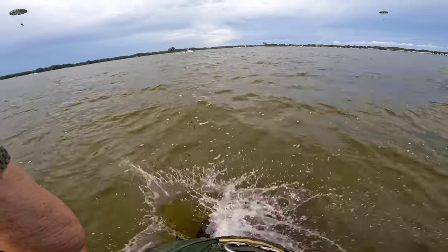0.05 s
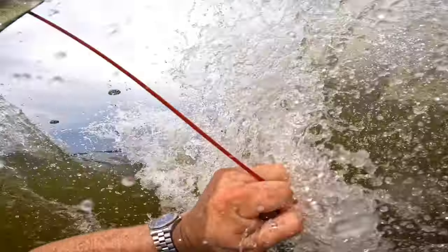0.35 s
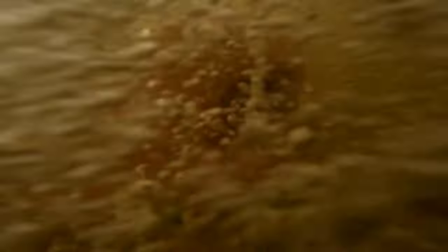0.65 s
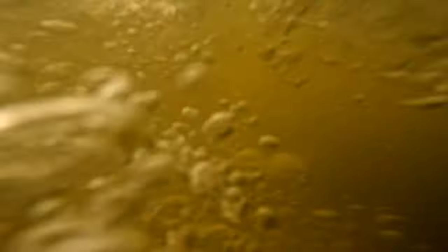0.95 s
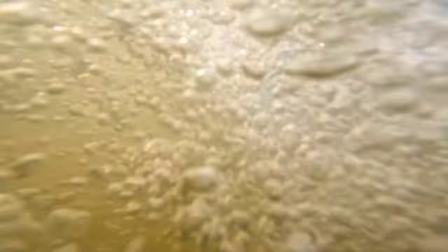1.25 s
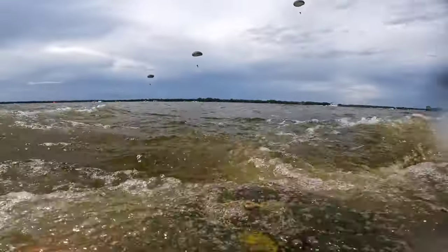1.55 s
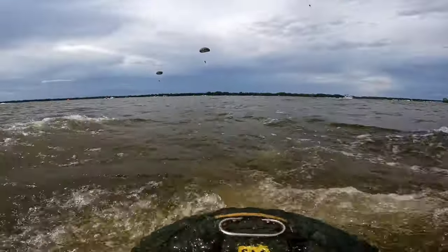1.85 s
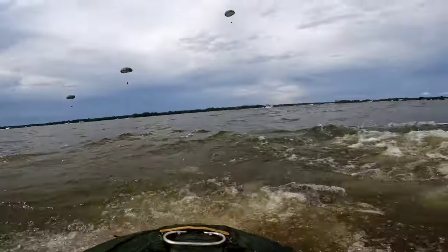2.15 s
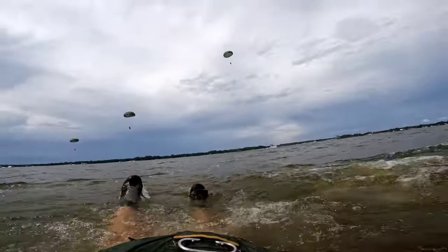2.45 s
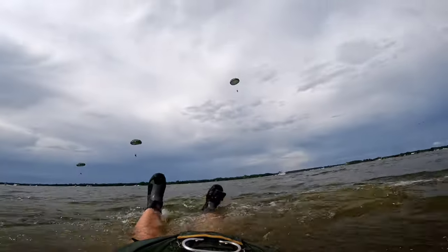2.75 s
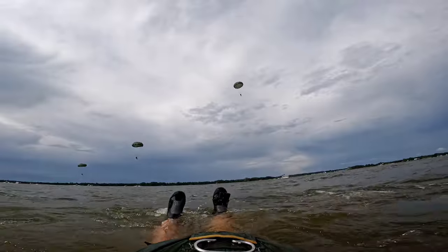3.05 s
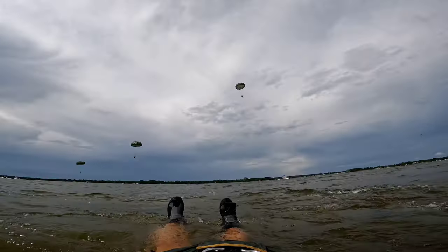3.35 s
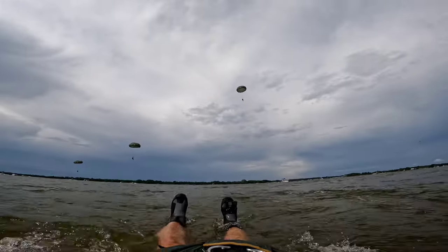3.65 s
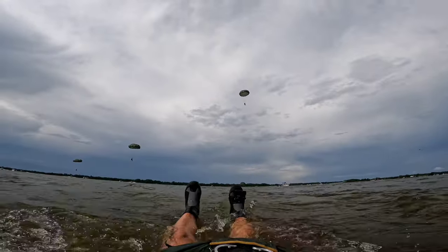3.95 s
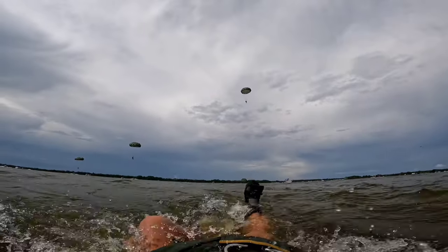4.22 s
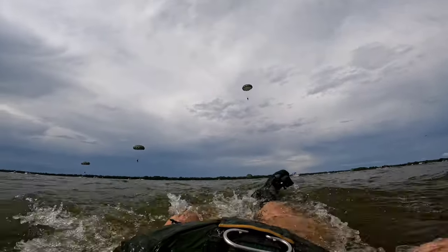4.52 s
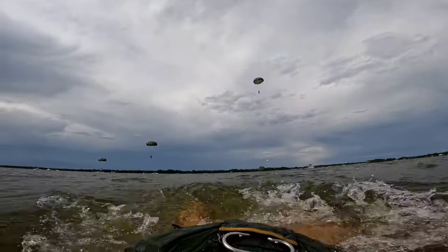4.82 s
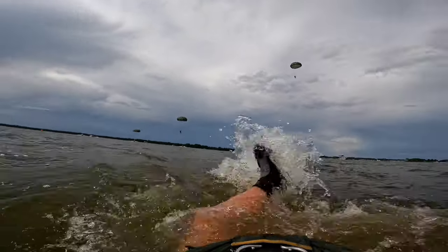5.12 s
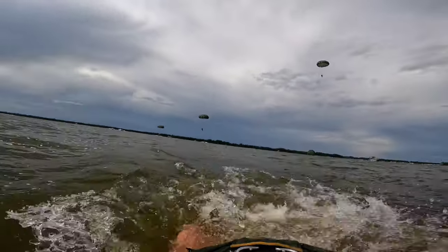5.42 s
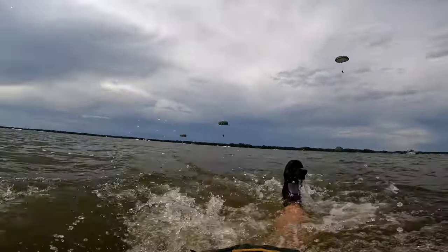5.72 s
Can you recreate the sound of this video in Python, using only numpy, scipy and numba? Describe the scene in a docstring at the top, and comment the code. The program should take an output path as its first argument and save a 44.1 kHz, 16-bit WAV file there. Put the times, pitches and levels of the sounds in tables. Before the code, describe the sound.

Wind buffets a body-worn microphone as a parachutist hits a lake in a rising sheet of spray. The microphone plunges under with dull thumps and a loud, muffled gurgle of bubbles. It surfaces to quiet lapping, small glugs and drops ticking on its case over a low rumble. Kicking legs then churn the water close by, and a thin, high fizz grows near the end.

```python
"""Water splashes over a parachutist's body-worn camera on landing in a lake. Wind buffets the microphone,
the feet plough up a sheet of spray, and the camera goes under in a cloud of bubbles, each ringing as
its trapped air pulsates. It surfaces with wet, muffled ports: water laps, drops tick on the case,
kicking legs churn the surface, and the water film on the left port begins to fizz."""
import sys
import numpy as np
from scipy import signal
from scipy.fft import rfft, irfft, next_fast_len
from scipy.io import wavfile
from scipy.ndimage import uniform_filter1d
from numba import njit

SR = 44100
rng = np.random.default_rng(int(sys.argv[2]) if len(sys.argv) > 2 else 0)


def materialize(psi):
    """Save the field psi as 16-bit PCM at rate SR to the path in sys.argv[1].

    A 1-D psi becomes a single channel; in a 2-D psi each row is a channel.
    """
    bounded = np.clip(np.atleast_2d(psi).T, -1, 1)
    quanta = np.round(bounded * 32767).astype(np.int16)
    wavfile.write(sys.argv[1], SR, quanta)


N = 254898
TIME = np.arange(N) / SR
# The feet touch the lake, the camera dips under, its ports flood, it comes up, the ports begin to drain.
TOUCH_S, DIVE_S, FLOOD_S, SURFACE_S, DRAIN_S = 0.14, 0.779, 1.007, 1.515, 4.05
WASH_RISE_S = 0.006

# Slaps of water on the case. Each row: start in seconds, thump pitch in Hz, thump and smack levels in dB.
SLAPS = [(0.164, 128, -30.5, -17), (0.779, 192, -4, -10.5), (0.801, 208, -3.5, -19.5),
         (1.049, 149, -8.5, -14.5), (1.319, 153, -18, -15), (1.392, 153.6, -9, -23.5),
         (1.427, 130, -13, -16.5), (1.514, 103.4, -5.5, -15), (1.652, 136, -7, -16),
         (2.195, 129.5, -24, -40), (2.294, 154, -23, -31), (2.724, 172, -10.5, -43.5),
         (3.244, 132, -22, -36.5), (5.172, 135, -12, -27.5)]
# Fat drops and the water that washes over the case with them.
# Each row: start in seconds, relative splat and wash levels in dB, drain time in seconds.
DROPS = [(1.77, -43.5, -66, 0.018), (2.191, -30.5, -50, 0.026), (2.7259, -20, -42, 0.037),
         (2.827, -28, -52, 0.045), (2.933, -26, -46, 0.029), (3.04, -28.5, -46, 0.011),
         (3.395, -32.5, -61.5, 0.0094), (4.175, -19.5, -48, 0.0064), (5.187, -17.5, -32.5, 0.018),
         (5.294, -20, -33, 0.013), (5.42, -17, -38, 0.0055), (5.508, -16, -39, 0.0085)]
# Spectral shape of churned water. Each row: frequency in Hz, gain in dB.
CHURN_COLOUR = [(250, -23), (420, -4.5), (600, 0.5), (900, 2), (1430, -2), (1650, -13), (2200, -16.5),
                (3500, -35.5), (5700, -50.5), (7500, -76)]


def from_db(db):
    """Decibels to amplitude gain."""
    return 10 ** (np.asarray(db) / 20)


def rms_one(x):
    """Normalisation to unit rms."""
    return x / np.sqrt(np.mean(x ** 2) + 1e-20)


def steady(x):
    """Division by the running rms evens out the slow level and leaves the grain."""
    power = uniform_filter1d(x ** 2, SR // 9)
    return x / np.sqrt(np.abs(power) + np.mean(x ** 2) / 1000)


def drift(rate):
    """Low-passed noise of unit spread wanders about rate times a second."""
    pole = np.exp(-80 * np.pi * rate / SR)
    slow = signal.lfilter([1], [1, -2 * pole, pole * pole], rng.standard_normal(N // 40 + 2002))[2000:]
    return np.interp(np.arange(N) / 40, np.arange(len(slow)), rms_one(slow))


def envelope(start_s, end_s, attack_s, release_s, sag_db_per_s=0):
    """Exponential attack, a hold that may sag, and exponential release."""
    age = np.maximum(TIME - start_s, 0)
    hold = from_db(-sag_db_per_s * np.minimum(age, end_s - start_s))
    return (1 - np.exp(-age / attack_s)) * hold * np.exp(-np.clip((TIME - end_s) / release_s, 0, 20))


def surges(times, levels_db, rise_s, falls_s):
    """Swells grow exponentially to peak at the given times, then decay."""
    rows = np.broadcast_arrays(np.atleast_1d(times), levels_db, falls_s)
    return sum(from_db(db) * np.exp(-np.minimum(np.maximum((s - TIME) / rise_s, (TIME - s) / fall), 20))
               for s, db, fall in zip(*rows))


def agitation(follows, lag_s=0, emerge_s=0.62):
    """A power law ties gain to the churning once the camera is up; it is 1 at the hardest kicking."""
    # Calm lapping, then kicking. Each row: time in seconds, relative level in dB.
    churn = [(1.7, -29), (1.92, -43.5), (2.5, -44), (2.78, -37.5), (3.45, -38), (3.55, -25), (3.8, -21),
             (4.12, -19.5), (4.3, -19), (4.58, -23), (4.75, -21), (4.88, -23), (4.97, -22), (5.78, -21)]
    s, db = np.transpose(churn)
    emerged = np.clip((TIME - SURFACE_S) / emerge_s, 0, 1)
    return from_db(follows * (np.interp(TIME - lag_s, s, db) - db.max())) * emerged


def colour(x, points):
    """Folding the cepstrum gives a causal, minimum-phase filter through points of (Hz, dB)."""
    size = 2 * next_fast_len(N // 2 + SR // 10)
    hz, db = np.transpose(points)
    grid = np.maximum(np.arange(size // 2 + 1) * SR / size, 1)
    cepstrum = irfft(np.log(from_db(np.interp(np.log(grid), np.log(hz), db))))
    cepstrum[1:size // 2] *= 2
    cepstrum[size // 2 + 1:] = 0
    return irfft(rfft(x, size) * np.exp(rfft(cepstrum)))[..., :N]


def strikes(rows, points):
    """Each sharp contact, a row of (seconds, peak dB), sounds the impulse response of a colour."""
    clicks, unit = np.zeros((2, N))
    unit[0] = 1
    for s, db in rows:
        clicks[int(s * SR)] += from_db(db)
    sound, response = colour(np.array([clicks, unit]), points)
    return sound / np.abs(response).max()


def droplets(per_s, spread_db, clump_db):
    """Shot noise: random impacts of unequal size clump as their rate wanders."""
    born = rng.random(N) < per_s * from_db(clump_db * drift(35)) / SR
    return born * from_db(spread_db * np.minimum(rng.exponential(1, N), 4)) * rng.choice([-1, 1], N)


@njit
def ring_bubbles(start, hz, height, cycles, rise, swell):
    """A bubble is a damped oscillator: it swells, dies away and climbs in pitch nearing the surface."""
    out = np.zeros(N)
    for k in range(len(start)):
        length = cycles[k] * SR / hz[k]
        first, phase = int(start[k] * SR), 0.
        for i in range(min(int(length), N - first)):
            age = i / length
            phase += 2 * np.pi * hz[k] * (1 + rise[k] * age) / SR
            out[first + i] += height[k] * np.exp(-6.9 * age) * (1 - np.exp(-age / swell)) * np.sin(phase)
    return out


def bubbles(span, low_hz, high_hz, cycles, spread_db, rise, count, swell=0.18, centre=None):
    """Bubbles born at random add incoherently; given a moving centre, their pitches are offsets from it."""
    when, pitch, size, life, climb = rng.random((count, 5)).T
    start = span[0] + (span[1] - span[0]) * when
    hz = low_hz + (high_hz - low_hz) * pitch + (np.interp(start, *np.transpose(centre)) if centre else 0)
    height = np.sqrt(hz) * from_db(spread_db * np.minimum(-np.log(1 - size), 3))
    polarity = (-1) ** np.arange(count)
    return ring_bubbles(start, hz, height * polarity, cycles * (.5 + life), 2 * rise * climb, swell)


def buffeting(wind_db=-17.5, sunk_db=-29.0, shove_db=-14.5, water_hz=1800.0):
    """Turbulent pressure: eddies of air, then duller ones of water, press on the ports; slaps shove them."""
    # Spectral shape of the eddies. Each row: frequency in Hz, gain in dB.
    eddy_colour = [(12, -13.5), (30, 0.5), (60, -4), (110, -5), (200, -14.5), (330, -22), (500, -33),
                   (1500, -50.5), (5000, -59), (7500, -73.5), (9000, -81.5)]
    # Rumble on the ports once afloat. Each row: time in seconds, level in dB.
    rumble = [(1.7, -36.5), (2.45, -44.5), (2.9, -32.5), (4.07, -33.5), (4.95, -39.5), (5.26, -32.5),
              (5.78, -34)]
    eddies = steady(colour(rng.standard_normal(N), eddy_colour) * from_db(3 * drift(28)))
    dull_eddies = signal.sosfilt(signal.butter(2, water_hz, fs=SR, output="sos"), eddies)
    wind = from_db(wind_db) * envelope(0, DIVE_S, 0.0027, 0.0055, sag_db_per_s=9.5)
    afloat = from_db(np.interp(TIME, *np.transpose(rumble))) * agitation(follows=0)
    water = from_db(sunk_db) * envelope(DIVE_S, SURFACE_S, .01, 0.048) + afloat
    s, _, thump_db, _ = np.transpose(SLAPS)
    shoves = surges(s, thump_db + shove_db, .005, 0.089)
    return wind * eddies + np.hypot(water, shoves) * dull_eddies


def spray(fine_db=-27.5, heavy_db=-19.5, heavy_lag_s=0.075, heavy_hz=1720.0, side_db=-3.0):
    """Impact noise in stereo: fine drops crest, heavy water follows, and a wall of it closes over."""
    # Spectral shape of the impacts. Each row: frequency in Hz, gain in dB.
    spray_colour = [(80, -16.5), (170, 0), (450, -1.5), (1000, -4.5), (1500, -7), (2100, -9.5),
                    (3100, -6.5), (4500, -13.5), (6500, -21), (8200, -29.5), (10300, -29), (12000, -77.5)]
    wall = 1 + surges(DIVE_S, 0, 0.033, 0.033)
    crest = surges(0.32, -7, 0.04, 0.04)
    fine = from_db(fine_db) * (wall + crest) * envelope(TOUCH_S, DIVE_S, 0.038, 0.0066)
    heavy = from_db(heavy_db) * wall * envelope(TOUCH_S + heavy_lag_s, DIVE_S, 0.033, 0.0031)
    rain, stray = (steady(colour(droplets(5000, spread_db=3, clump_db=2), spray_colour)) for _ in range(2))
    body = signal.lfilter(*signal.butter(1, heavy_hz, fs=SR), rain)
    middle = heavy * body + fine * (rain - body)
    # The finest drops hit each port on their own.
    side = from_db(side_db) * fine * signal.lfilter(*signal.butter(2, 9000, "high", fs=SR), stray)
    return np.array([middle + side, middle - side])


def slaps(cycles=9.6, sag=0.17, smack_s=0.0075):
    """Impact gives a dull smack; the trapped air resonates in a thump that sinks in pitch as it spreads."""
    # Spectral shape of a smack. Each row: frequency in Hz, gain in dB.
    smack_colour = [(120, -7), (400, 8.5), (700, 1.5), (1150, -2.5), (1450, -16), (2000, -39),
                    (4000, -64.5), (7000, -94.5)]
    s, hz, thump_db, smack_db = np.transpose(SLAPS)
    each = np.ones(len(s))
    thumps = ring_bubbles(s, hz, from_db(thump_db), cycles * each, -sag * each, swell=0.1)
    force = sum(from_db(db) * (TIME >= at) * np.exp(-np.minimum(np.abs(TIME - at) / smack_s, 20))
                for at, db in zip(s, smack_db))
    noise = rng.standard_normal(N)
    smacks, even = colour(np.array([force * noise, noise]), smack_colour)
    return thumps + smacks / even.std()


def bubble_cloud(cloud_db=-18.0, plunge_db=-12.0, trail_db=-37.0, hollow_db=-5.0, ping_db=-68.5):
    """Air dragged down resonates: big bubbles ring most at the plunge, some gurgle, small ones ping."""
    # The hollow gurgle, sinking and rising. Each row: time in seconds, pitch in Hz.
    gurgle = [(0.8, 730), (0.956, 585), (1.01, 726), (1.19, 586), (1.32, 645), (1.48, 556), (1.57, 650)]
    # Spectral shape of the cloud. Each row: frequency in Hz, gain in dB.
    cloud_colour = [(60, 1.5), (130, 0), (240, -2), (450, -6.5), (620, -8.5), (820, -9), (1050, -23.5),
                    (1300, -30.5), (1650, -38), (3000, -59.5), (5000, -95)]
    span = DIVE_S, SURFACE_S + 0.13
    sunk = envelope(DIVE_S, SURFACE_S, 0.031, 0.015)
    cloud = from_db(cloud_db) * sunk + from_db(trail_db) * envelope(SURFACE_S, span[1], .005, .02)
    plunge = sunk * surges(DIVE_S, plunge_db, .01, 0.1)
    swarm = bubbles(span, 70.0, 1598, cycles=14.4, spread_db=1.5, rise=0.19, count=1800)
    hollow = bubbles(span, -57.5, 43, cycles=27, spread_db=1.0, rise=0.07, count=200, centre=gurgle)
    pings = bubbles((DIVE_S, SURFACE_S), 2200, 3100, cycles=50, spread_db=1.5, rise=.05, count=60)
    return ((cloud + plunge) * steady(colour(swarm, cloud_colour))
            + cloud * from_db(hollow_db) * steady(hollow)
            + from_db(ping_db) * steady(pings))


def crackle(dive_db=-28.0, flooded_db=-60.0, burst_s=0.0054):
    """Bubbles burst on the case as pressure pulses; the small ones fade as the ports flood."""
    # Big single bursts. Each row: time in seconds, level in dB.
    bursts = [(0.84, -21.5), (0.931, -29), (0.984, -30), (1.007, -33), (1.427, -30), (1.515, -34.5)]
    # Spectral shape of a burst under water. Each row: frequency in Hz, gain in dB.
    burst_colour = [(600, -8), (1200, 13), (1900, 5.5), (2900, -3), (3800, -14), (6000, -22.5), (7200, -85),
                    (10000, -96)]
    flooding = from_db(dive_db) * envelope(DIVE_S, FLOOD_S, 0.0016, 0.0078, sag_db_per_s=33.5)
    flooded = from_db(flooded_db) * envelope(DIVE_S, SURFACE_S, 0.031, 0.015)
    small = steady(colour(droplets(1000, spread_db=3, clump_db=3.5), burst_colour))
    big = rms_one(colour(rng.standard_normal(N), burst_colour))
    return (flooding + flooded) * small + surges(*np.transpose(bursts), 0.00035, burst_s) * big


def glugs(gain_db=10.0, cycles_at_1khz=51.0, rise=0.15):
    """The biggest bubbles resonate singly; damping ends the low ones in fewer cycles."""
    # Each row: start in seconds, pitch in Hz, relative level in dB.
    big_bubbles = [(0.803, 820, -18), (0.941, 544, -17.5), (1.047, 693, -14), (1.08, 618, -20),
                   (1.135, 1070, -28.5), (1.431, 1114, -23), (1.725, 1600, -41), (1.778, 975, -32.5),
                   (2.634, 407, -32.5), (2.729, 1545, -31.5), (2.864, 1650, -37), (3.652, 1050, -19),
                   (3.72, 544, -23.5), (4.111, 1278, -19.5), (4.122, 204, -24), (4.164, 231, -21),
                   (4.755, 236, -23), (5.357, 688, -18.5), (5.51, 1150, -20.5)]
    s, hz, db = np.transpose(big_bubbles)
    cycles = cycles_at_1khz * np.sqrt(hz / 1000)
    return ring_bubbles(s, hz, from_db(db + gain_db), cycles, np.full(len(s), rise), swell=0.039)


def drops_on_case(splat_gain_db=1.0, wash_gain_db=0.5, sizzle_db=-46.0):
    """Impacts excite the wet case, over a sizzle of tiny bubbles that swells with churning and washes."""
    # Fine droplets that tick crisply. Each row: time in seconds, peak in dB.
    ticks = [(1.366, -40), (1.837, -41.5), (3.88, -21.5), (5.12, -28), (5.263, -26)]
    # Response of the case to fat drops and to fine ones. Each row: frequency in Hz, gain in dB.
    splat_colour = [(1000, -11), (1800, 8), (2700, 5.5), (3300, -2), (3600, -14), (4300, -23.5),
                    (5000, -55.5), (9000, -83.5)]
    tick_colour = [(1200, -4.5), (2800, 4.5), (3500, -4.5), (4500, -26.5), (10000, -58.5)]
    s, splat_db, wash_db, drain_s = np.transpose(DROPS)
    washes = surges(s, wash_db + wash_gain_db, WASH_RISE_S, drain_s)
    wetness = from_db(sizzle_db) * agitation(follows=0.91, lag_s=0.097) + washes
    sizzle = steady(colour(droplets(3000, spread_db=2, clump_db=3.5), splat_colour))
    splats = strikes(zip(s, splat_db + splat_gain_db), splat_colour)
    return splats + strikes(ticks, tick_colour) + wetness * sizzle


def churning(small_db=-22.0, note_db=-6.5, pocket_db=-28.0, lap_db=1.1, laps_per_s=9):
    """Air entrainment by waves and kicks: foam bursts, a few bubbles ring on, and pockets gulp later."""
    # Spectral shape of the air pockets. Each row: frequency in Hz, gain in dB.
    pocket_colour = [(70, -21), (150, -2), (230, -3), (330, -4.5), (470, -6.5), (700, -8.5)]
    laps = from_db(lap_db * drift(laps_per_s))
    span = SURFACE_S, N / SR
    swarm = rms_one(bubbles(span, 328.7, 1918, cycles=33.8, spread_db=0.5, rise=0.17, count=2600))
    foam = rms_one(droplets(1400, spread_db=3.5, clump_db=3.5))
    notes = steady(bubbles(span, 560, 1400, cycles=55, spread_db=1.0, rise=0.16, count=260))
    gulps = bubbles(span, 104.0, 598, cycles=9.6, spread_db=2.5, rise=0.29, count=900)
    small = steady(colour(swarm + 2.48 * foam, CHURN_COLOUR)) + from_db(note_db) * notes
    pockets = steady(colour(gulps, pocket_colour))
    return (from_db(small_db) * agitation(follows=0.95) * laps * small
            + from_db(pocket_db) * agitation(follows=0.85, lag_s=0.23) * pockets)


def case_ring(linger=1.5):
    """Forced resonance: lapping keeps the hollow case faintly ringing, and run-off drives it harder."""
    # Each row: frequency and bandwidth in Hz, level under run-off and under lapping in dB.
    modes = [(1500, 300, -9.5, -55), (3104, 220, -7.5, -70.5)]
    s, _, wash_db, drain_s = np.transpose(DROPS)
    run_off = surges(s, wash_db, WASH_RISE_S, linger * drain_s)
    lapping = agitation(follows=.3)
    out = 0
    for hz, width_hz, run_off_db, lapping_db in modes:
        b, a = signal.iirpeak(hz, hz / width_hz, fs=SR)
        patter = droplets(500, spread_db=2, clump_db=2)
        ringing = steady(signal.lfilter(b, a, signal.lfilter(b, a, patter + 1e-18)))
        out += (from_db(run_off_db) * run_off + from_db(lapping_db) * lapping) * ringing
    return out


def plips(gain_db=6.0, hz=2955.0, drain_times=1.9, fade_db=10, cycles=100.0, count=8):
    """Each wash leaves a few small resonating bubbles, fainter as it drains."""
    s, _, wash_db, drain_s = np.repeat(DROPS, count, axis=0).T
    late = (np.tile(np.arange(count), len(DROPS)) + rng.random(len(s))) / count
    pitch = hz * (1 + rng.uniform(-1, 1, len(s)) / 10)
    height = from_db(wash_db + gain_db - fade_db * late)
    each = np.ones(len(s))
    return ring_bubbles(s + drain_times * drain_s * late, pitch, height, cycles * each, each / 20, 0.05)


def chuckles(run_s=.032, cycles=20.3, rise=0.087, count=6):
    """Air under a folding wavelet fragments into a quick run of bubbles, each a step in pitch."""
    # Each row: start in seconds, pitch at the start and end of the run in Hz, level in dB.
    runs = [(2.607, 1480, 385, -23), (2.996, 1300, 635, -20.5), (3.745, 1160, 642, -10),
            (4.195, 624, 1180, -14), (5.255, 444, 240, -21.5)]
    s, first_hz, last_hz, db = np.repeat(runs, count, axis=0).T
    along = (np.tile(np.arange(count), len(runs)) + rng.random(len(s)) / 2) / count
    pitch = first_hz * (last_hz / first_hz) ** along
    each = np.ones(len(s))
    return ring_bubbles(s + run_s * along, pitch, from_db(db), cycles * each, rise * each, swell=0.059)


def sloshes(attack_s=0.0017, band_ratio=1.36):
    """A wavelet breaking close by entrains a sudden cluster of heavily damped bubbles round one pitch."""
    # Each row: time in seconds, pitch in Hz, level in dB, decay time in seconds.
    wavelets = [(3.022, 840, -29.5, 0.0078), (3.268, 980, -31.5, 0.013), (3.413, 980, -30.5, 0.019),
                (3.525, 1350, -27, 0.043), (3.586, 805, -17, 0.0086), (4.95, 1040, -19, 0.0071),
                (5.235, 745, -21.5, 0.0067)]
    swarm = bubbles((SURFACE_S, N / SR), 250, 1680, cycles=6.6, spread_db=0.5, rise=0.083, count=9000)
    foam = colour(swarm, CHURN_COLOUR)
    out = np.zeros(N)
    for s, hz, db, fall_s in wavelets:
        band = signal.butter(2, [hz / band_ratio, hz * band_ratio], "band", fs=SR, output="sos")
        out += surges(s, db, attack_s, fall_s) * rms_one(signal.sosfilt(band, foam))
    return out


def film(fizz_db=-51.5, growth=1.04, pop_db=4.5, tick_db=-8.5):
    """Tiny bubbles rupture in the film, louder the longer it drains; the biggest tick through the case."""
    # The biggest pops. Each row: time in seconds, relative peak in dB.
    pops = [(4.6377, -21.5), (4.6823, -35), (4.851, -36), (5.055, -48), (5.7406, -47)]
    # Spectral shapes at the port and through the case. Each row: frequency in Hz, gain in dB.
    port_colour = [(10400, -55.5), (11100, -29), (11700, -11), (12400, -8), (14500, -16), (15200, -36)]
    case_colour = [(1500, -14), (3800, 17), (6000, -14), (10000, -26.5)]
    thinning = np.maximum(TIME - DRAIN_S, 0) ** growth
    bursts = rms_one(colour(droplets(3500, spread_db=4.5, clump_db=3.5), port_colour))
    fizz = from_db(fizz_db) * thinning * bursts + from_db(pop_db) * strikes(pops, port_colour)
    return fizz, from_db(tick_db) * strikes(pops, case_colour)


def scene(width_db=-16.0, wet_width=0.08, lean_db=2.0, film_right_db=-29.5, scatter_db=-10.5):
    """Mid and side: wet ports hear nearly the same; as they drain, the sound widens and leans right."""
    fizz, ticks = film()
    centre = (buffeting() + bubble_cloud() + crackle() + churning() + sloshes() + glugs() + slaps()
              + drops_on_case() + case_ring() + plips() + chuckles() + ticks)
    # The wet case scatters treble, which arrives 5.6 ms late.
    treble = signal.sosfilt(signal.butter(2, 7000, "high", fs=SR, output="sos"), centre)
    scattered = from_db(scatter_db) * np.interp(TIME - 0.0056, TIME, treble)
    drained = np.clip((TIME - DRAIN_S) / 0.57, 0, 1)
    width = from_db(width_db) * (wet_width + (1 - wet_width) * drained)
    side = width * (churning() + 1.4 * drained * buffeting()) + scattered
    ports = np.array([centre + side, centre - side]) * from_db(lean_db * drained * [[-.5], [.5]])
    return ports + spray() + np.array([fizz, from_db(film_right_db) * film()[0]])


def record(dry, ceiling=.85, cutoff_hz=15000):
    """Soft saturation rounds only the highest peaks, and a steep low-pass cuts the top."""
    rounded = dry / (1 + (dry / ceiling) ** 10) ** .1
    return signal.sosfilt(signal.ellip(10, .2, 80, cutoff_hz, fs=SR, output="sos"), rounded)


dry = scene()
out = record(dry)
materialize(out)
```